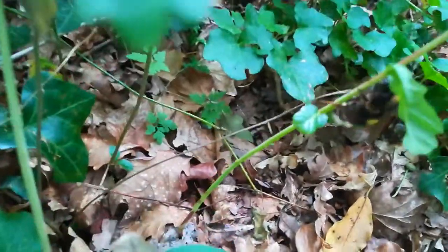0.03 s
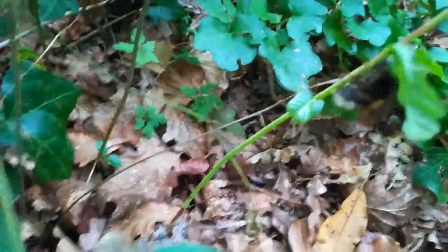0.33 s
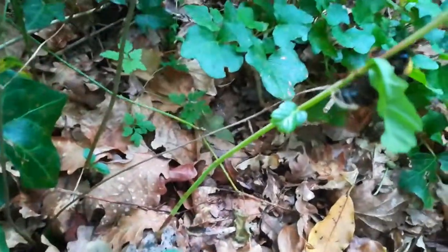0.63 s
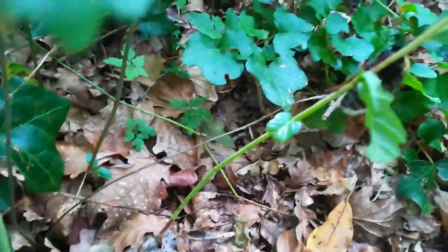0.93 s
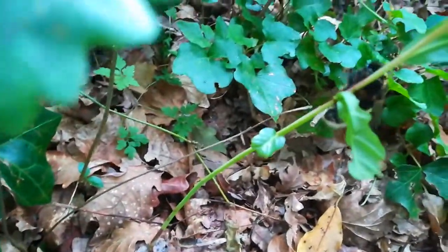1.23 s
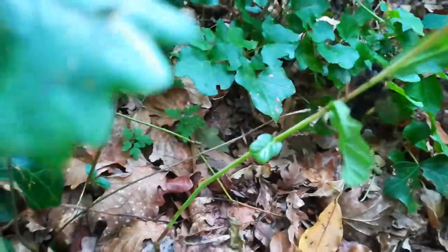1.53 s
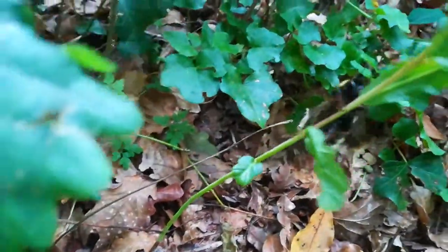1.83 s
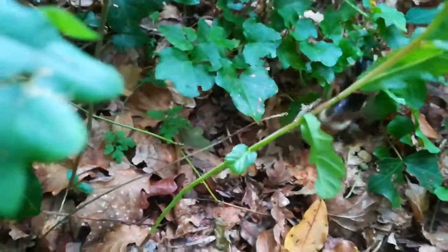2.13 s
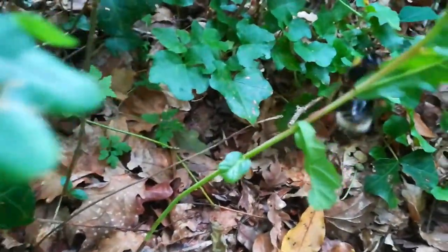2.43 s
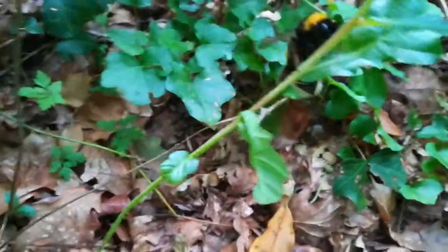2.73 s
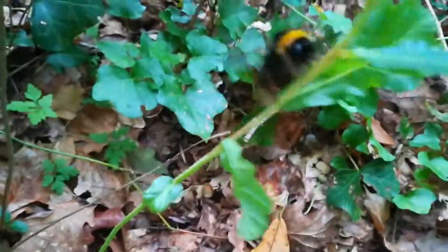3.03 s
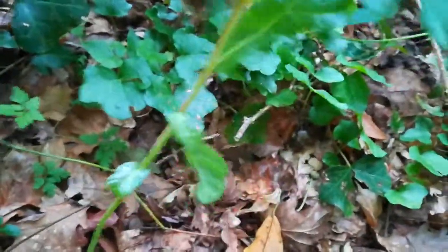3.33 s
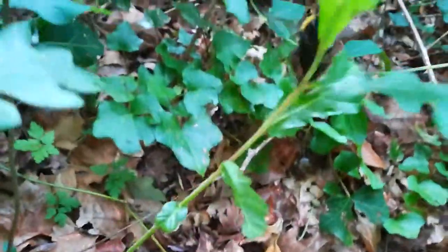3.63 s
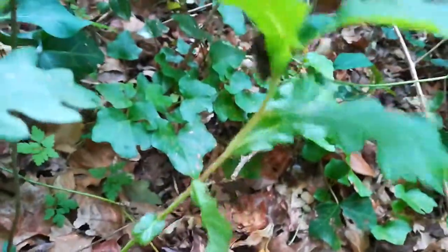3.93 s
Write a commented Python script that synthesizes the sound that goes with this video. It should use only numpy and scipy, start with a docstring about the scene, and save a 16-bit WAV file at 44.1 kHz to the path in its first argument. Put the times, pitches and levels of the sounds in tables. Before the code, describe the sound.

A bumblebee buzzes close by, but only from about 3 seconds. From the start, small birds whistle and trill faintly, echoing among trees over distant hiss and low rumble, with one soft microphone bump. Leaves tick and rustle, swelling around 1.5 seconds. At 3 seconds the bee's wings slap a leaf, then settle into a steady buzz with a papery rasp until the end at 4 seconds.

```python
"""A bumblebee climbing a stem starts its wings close by, about 3 s in. The first beats slap a leaf;
then it settles into a steady buzz, each wingbeat pushing air and brushing the leaf with a papery rasp.
From the start, small birds whistle and trill, echoed by the trees, and leaves rustle and tick
on the woodland floor. Under it all: distant hiss, low rumble and one soft bump on the microphone."""
import sys
import numpy as np
from scipy import signal
from scipy.fft import rfft, irfft
from scipy.io import wavfile
from scipy.ndimage import uniform_filter1d

SR = 44100
rng = np.random.default_rng(int(sys.argv[2]) if len(sys.argv) > 2 else 0)


def transcribe(signal):
    """Save signal, clipped to [-1, 1], as a 16-bit WAV file at the path in sys.argv[1]."""
    frames = np.atleast_2d(signal).T
    limited = np.clip(frames, -1, 1)
    pcm = np.round(limited * 32767).astype(np.int16)
    wavfile.write(sys.argv[1], SR, pcm)


N = 176400
TIME_S = np.arange(N) / SR

# Spectra. Each row: frequency in Hz, relative level in dB.
HISS_SPECTRUM = [(12, -54), (20, -8.5), (66, -5), (137, -4.5), (213, -9), (404, -14), (906, -10.5),
                 (1100, -11), (2090, -20), (3080, -21), (3350, -26.5), (5230, -12), (7730, -24),
                 (15500, -29.5)]
RUMBLE_SPECTRUM = [(15, 1), (55, 0.5), (120, -10.5), (300, -17.5), (900, -40.5)]
RUSTLE_SPECTRUM = [(150, -6), (500, -15), (900, -4), (1300, -1.5), (1900, 0.5), (3800, 3), (6000, -2),
                   (9000, -10.5), (12000, -23), (15500, -18)]
WASH_SPECTRUM = [(30, 2), (150, 2), (350, -3), (600, -12), (1200, -7), (2000, -13), (4000, -29)]
RASP_SPECTRUM = [(1120, -16), (1900, -14), (2680, -8.5), (3030, -5), (3800, -3), (4820, -0.5), (6970, -3.5),
                 (10700, -15.5), (13500, -17.5), (15500, -20)]
# Stereo balances. Each row: frequency in Hz, pan in dB (left minus right).
HISS_PAN = [(200, 1.5), (700, -2), (1300, -1.5), (3500, -1), (8000, -1), (15000, 0)]
RUSTLE_PAN = [(300, -3.5), (2400, -6), (4400, -7), (8000, 8), (15000, 2)]
RASP_PAN = [(2000, 4), (3000, 4), (4500, -7.5), (6000, 0.5), (8000, 7), (15000, 9)]
# Air noise. Each row: frequency in Hz, left-right correlation.
AIR_CORRELATION = [(60, .98), (130, .8), (290, .1), (640, -.25), (1400, .1), (3000, 0)]
# Envelopes. Each row: time in seconds, relative level in dB.
RUMBLE_LEVELS = [(0, -68), (.45, -62), (.9, -68), (1.15, -67), (1.45, -61.5), (1.75, -65), (2.0, -70.5),
                 (2.9, -65.5), (3.2, -60.5), (4, -65)]
RUSTLE_LEVELS = [(0, -67), (.75, -66.8), (.97, -67), (1.1, -62), (1.25, -58.5), (1.42, -55), (1.6, -57),
                 (1.77, -60.5), (1.87, -65), (2.1, -74), (2.9, -71.5)]
# Bird notes. Each row: start and length in seconds, first pitch, last pitch and trill depth in Hz,
# relative level in dB, pan in dB.
BIRD_NOTES = [(0.0, 0.064, 6540, 6840, 720, -50, 9), (0.176, 0.058, 6300, 6640, 370, -52.5, 6),
              (0.0, 0.11, 2600, 2350, 160, -66, -4.5), (0.18, 0.083, 2726, 3060, 130, -60.5, -8),
              (0.296, 0.035, 5570, 5280, 36, -49.5, 7), (0.334, 0.012, 5230, 5220, 73, -41, -2),
              (0.345, 0.047, 5166, 4850, 420, -48.5, -8), (0.41, 0.05, 5050, 4510, 500, -50, -10),
              (0.463, 0.15, 4530, 4324, 440, -56, -9), (0.583, 0.14, 4395, 4124, 310, -55.5, -13),
              (0.478, 0.21, 5590, 5350, 450, -66, -2), (0.709, 0.065, 7100, 8100, 200, -53.5, 11),
              (0.755, 0.064, 7880, 7520, 610, -57.5, 4), (0.866, 0.052, 5160, 5600, 490, -52.5, -4),
              (0.896, 0.056, 7600, 6840, 230, -58.5, 5), (1.019, 0.058, 5240, 5560, 550, -53, -6),
              (1.044, 0.062, 7220, 6600, 350, -56, 11), (1.171, 0.043, 5290, 5570, 560, -54, -6),
              (1.197, 0.065, 7510, 6420, 120, -55, 10), (1.338, 0.019, 4670, 4510, 53, -44.5, -3),
              (1.36, 0.0547, 4616, 4360, 123, -44, -7.5), (1.577, 0.067, 7000, 7370, 140, -54, 9),
              (1.638, 0.072, 7380, 7080, 260, -56.5, 8), (2.398, 0.04, 6394, 6520, 70, -47, 9),
              (2.467, 0.041, 5050, 4275, 110, -54.5, -5), (2.544, 0.0327, 5245, 4937, 94, -46.5, -3),
              (2.641, 0.07, 7530, 7300, 58, -53, 4.5), (2.887, 0.099, 3480, 3186, 115, -63, -9),
              (2.989, 0.11, 3105, 3063, 12, -56, -9), (3.599, 0.054, 5350, 4980, 510, -50, -12),
              (3.68, 0.09, 4570, 4180, 320, -56.5, -7), (3.795, 0.066, 3250, 3096, 150, -57, -13)]
# Dry leaf ticks. Each row: start in seconds, peak in dB, centre in Hz, decay in seconds, pan in dB.
LEAF_TICKS = [(0.411, -44, 4030, .002, -3), (1.073, -39.5, 6000, 0.0033, 1), (1.44, -45, 7500, .005, 10),
              (1.65, -47, 2110, 0.0005, -18), (2.736, -42, 2780, 0.0062, -17),
              (2.7628, -51, 2570, 0.0052, -6)]
# Wingbeat. Each row: time in seconds, rate in Hz.
WINGBEAT_RATES = [(2.96, 130), (3.0, 142), (3.02, 142), (3.06, 149), (3.115, 154), (3.15, 150.5),
                  (3.21, 154.5), (3.265, 146.5), (3.3, 148.5), (3.36, 146.5), (3.45, 150), (3.56, 148.5),
                  (3.61, 151), (3.76, 150.3), (3.81, 144.5), (3.835, 148.5), (3.885, 143), (3.92, 148),
                  (3.975, 142), (4.0, 151)]
# Buzz envelope. Each row: time in seconds, fundamental and octave in dB, relative overtone level in dB,
# overtone tilt in dB per octave.
BUZZ_LEVELS = [(2.97, -56, -54, -68, 11), (2.99, -48.5, -52.5, -61.5, 8), (3.025, -57, -52.5, -58.5, 7),
               (3.115, -48.5, -41, -49.5, 2), (3.22, -42, -43, -48.5, -2.5), (3.29, -41, -44.5, -50, -3),
               (3.48, -44, -48.5, -52, -7.5), (3.884, -45.5, -50, -53, -4),
               (3.976, -45.5, -48.5, -56.5, -3), (4.0, -48.5, -45.5, -52, 5)]
# Buzz harmonics from the third up. Each row: left and right relative level in dB.
OVERTONE_LEVELS = [(-9, -10), (-6, -14), (2.5, -11), (-5.5, -14), (.5, -7), (-6, -13), (-12.5, -9.5),
                   (-15, -16), (-13.5, -11), (-19, -14), (-19, -19)]
# Buzz stereo phase. Each row: harmonic number, lead of the left microphone in radians.
HARMONIC_LEADS = [(1, .35), (2, .9), (3, 2), (5, 2.1), (7, 1.1)]
# Wings brushing the leaf. Each row: time in seconds, relative level in dB, pan in dB.
RASP_LEVELS = [(2.97, -51, -2), (3.0, -46.5, -6), (3.04, -49.5, -3.5), (3.066, -45.5, 1), (3.142, -53, 2),
               (3.22, -49, 5.5), (3.496, -53.5, 2.0), (3.628, -53, -1.5), (3.982, -54, -1), (4.0, -47, 1)]
# Wings striking the leaf. Each row: start in seconds, peak in dB, ring in Hz, decay in seconds.
WING_SLAPS = [(2.9719, -36, 4970, 0.0014), (2.98, -37.5, 5140, .0016), (2.986, -38, 4800, 0.0017),
              (2.9927, -38, 5160, .0016), (3, -27.5, 5300, 0.00099), (3.0078, -36, 5600, .0018),
              (3.0222, -38, 5900, 0.0021), (3.0512, -30.5, 4850, .0016), (3.057, -39, 4830, .0015),
              (3.0632, -49, 5600, 0.0015), (3.069, -28.5, 4700, .0017), (3.0765, -29, 4840, .0016)]
# Struck leaf. Each row: multiple of the ring frequency, relative level in dB.
LEAF_SPECTRUM = [(.1, -14), (.5, -12), (.75, -9), (1, 13), (1.4, -5), (1.8, -15), (3, -32)]


def amp(db):
    """Decibels to gain."""
    return 10 ** (np.asarray(db) / 20)


def unit_rms(x):
    """Scales to rms 1."""
    return x / np.sqrt(np.mean(x ** 2) + 1e-20)


def curve(table, column=1):
    """One column of a time table at every sample."""
    table = np.array(table)
    return np.interp(TIME_S, table[:, 0], table[:, column])


def at_hz(table, hz):
    """Interpolates a table over log frequency."""
    table_hz, value = np.transpose(table)
    return np.interp(np.log(hz + 1), np.log(table_hz + 1), value)


def pan(db):
    """Left and right gains of constant power."""
    gains = amp(np.array([[.5], [-.5]]) * db)
    return gains / np.sqrt((gains ** 2).mean(0))


def colour(x, spectrum, pans=None):
    """Filters by a spectrum and an optional pan table; rms 1."""
    hz = np.fft.rfftfreq(x.shape[-1], 1 / SR)
    gain = amp(at_hz(spectrum, hz)) * (1 if pans is None else pan(at_hz(pans, hz)))
    return unit_rms(irfft(rfft(x) * gain, x.shape[-1]))


def drift(rate_hz):
    """Slow random wander; rms 1."""
    hz = np.fft.rfftfreq(N, 1 / SR)
    return unit_rms(irfft(rfft(rng.standard_normal(N)) * np.exp(-(hz / rate_hz) ** 2), N))


def air_noise():
    """White noise, alike at both microphones in the bass, unrelated in the treble."""
    left, other = rfft(rng.standard_normal((2, N)))
    correlation = np.clip(at_hz(AIR_CORRELATION, np.fft.rfftfreq(N, 1 / SR)), -1, 1)
    return irfft([left, correlation * left + np.sqrt(1 - correlation ** 2) * other], N)


def crackle(spread_db):
    """Stereo noise in 16-sample grains of uneven level."""
    noise = rng.standard_normal((2, N))
    grain_db = spread_db * np.clip(rng.standard_normal((2, N // 16 + 1)), -3, 3)
    return noise * amp(grain_db.repeat(16, 1)[:, :N])


def burst(decay_s, spectrum, size=4096):
    """Decaying puff of filtered noise; peak near 1."""
    puff = colour(rng.standard_normal((2, size)) * np.exp(-TIME_S[:size] / decay_s), spectrum)
    puff *= np.minimum(np.linspace(2, 0, size), 1) ** 2
    return puff / abs(puff).max(1).mean()


def add(mix, start_s, sound):
    """Mixes a sound in at start_s."""
    part = mix[:, round(start_s * SR):][:, :sound.shape[-1]]
    part += sound[..., :part.shape[1]]


def woodland(hiss_db=-67.5, rumble_trim_db=-2.5):
    """Steady distant hiss and a swelling low rumble."""
    hiss = amp(hiss_db) * colour(air_noise(), HISS_SPECTRUM, HISS_PAN)
    rumble = colour(rng.standard_normal(N), RUMBLE_SPECTRUM)
    return hiss + amp(rumble_trim_db + curve(RUMBLE_LEVELS)) * rumble


def birds(trill_hz=115.37, full_pulse_depth_hz=400, fall_s=.0063, direct_db=-8.5, echo_db=-1.5):
    """Gliding, trilled whistles among trees; deeper trills also pulse more in level."""
    out = np.zeros((2, N))
    trill = np.exp(2j * np.pi * np.cumsum(trill_hz * (1 + .25 * drift(71.05))) / SR)
    for start_s, length_s, first_hz, last_hz, depth_hz, db, pan_db in BIRD_NOTES:
        t = np.arange(0, length_s, 1 / SR)
        warble = trill[int(start_s * SR):][:len(t)]
        hz = first_hz + (last_hz - first_hz) * (t / length_s) ** .6 + depth_hz * warble.imag
        pulsing = 1 + .55 * min(depth_hz / full_pulse_depth_hz, 1) * warble.real
        envelope = np.minimum(t / (.14 * length_s), 1) * np.minimum((length_s - t) / fall_s, 1)
        note = envelope * pulsing * np.sin(2 * np.pi * np.cumsum(hz) / SR)
        gain = np.sqrt(2) * amp(db) * pan(pan_db)
        add(out, start_s, gain * amp(direct_db) * note)
        add(out, start_s, gain * amp(echo_db) * tree_echo(note))
    return out


def tree_echo(note, t60_s=.58, build_s=.00067):
    """Diffuse scatter from the trees, with the note's energy in each channel."""
    lag_s = TIME_S[:SR]
    envelope = np.exp(-np.log(1000) * lag_s / t60_s) * (1 - np.exp(-lag_s / build_s))
    echo = signal.fftconvolve(note[None], rng.standard_normal((2, SR)) * envelope, axes=1)
    return echo * np.linalg.norm(note) / np.linalg.norm(echo, axis=1, keepdims=True)


def leaf_rustle(flutter_db=2.02):
    """Dense tiny leaf clicks that swell and fade."""
    rustle = colour(crackle(spread_db=2), RUSTLE_SPECTRUM, RUSTLE_PAN)
    return rustle * amp(curve(RUSTLE_LEVELS) + flutter_db * drift(25.5))


def microphone_bump(start_s=.1362, gain_db=-41, rise_s=.0029, decay_s=.0073,
                    first_hz=231, last_hz=91, sag_s=.0059):
    """One soft knock on the microphone, sagging in pitch as it dies."""
    out, t = np.zeros((2, N)), TIME_S[:4096]
    hz = last_hz + (first_hz - last_hz) * np.exp(-t / sag_s)
    envelope = np.minimum(t / rise_s, 1) * np.exp(-t / decay_s)
    add(out, start_s, amp(gain_db) * envelope * np.sin(2 * np.pi * np.cumsum(hz) / SR))
    return out


def leaf_ticks(skirt_db_per_octave=24):
    """Dry leaves tick: short bursts of band noise."""
    out, octaves = np.zeros((2, N)), np.linspace(-4, 4, 9)
    for start_s, peak_db, centre_hz, decay_s, pan_db in LEAF_TICKS:
        band = np.column_stack([centre_hz * 2 ** octaves, -skirt_db_per_octave * abs(octaves)])
        add(out, start_s, amp(peak_db) * pan(pan_db) * burst(decay_s, band))
    return out


def bumblebee(start_s=2.961, buzz_rise_s=.006, rasp_rise_s=.028, jitter=.006):
    """One slightly unsteady wingbeat drives both buzz and rasp."""
    beats = np.cumsum(curve(WINGBEAT_RATES) * (1 + jitter * drift(41.6))) / SR
    buzz = np.clip((TIME_S - start_s) / buzz_rise_s, 0, 1) * wing_buzz(beats)
    rasp = np.clip((TIME_S - start_s) / rasp_rise_s, 0, 1) * wing_rasp(beats)
    return buzz + rasp


def per_beat(beats):
    """One random value per wingbeat, steps smoothed."""
    return uniform_filter1d(rng.standard_normal(size=1000)[beats.astype(int)], size=60)


def harmonic(order, beats, shift_rad=0):
    """One wingbeat harmonic at both microphones, left leading; rms 1."""
    lead_rad = np.array([[.5], [-.5]]) * np.interp(order, *np.transpose(HARMONIC_LEADS))
    return np.sqrt(2) * np.cos(2 * np.pi * order * beats + shift_rad + lead_rad)


def wing_buzz(beats, overtone_trim_db=-4, wash_db=-55, flutter_db=1.3, rattle_db=1.4, pivot_order=6):
    """Wings push air: a hum, a wash of noise, and overtones uneven in force and timing."""
    hum = amp(curve(BUZZ_LEVELS, 1)) * harmonic(1, beats)
    hum += amp(curve(BUZZ_LEVELS, 2)) * harmonic(2, beats)
    effort, tilt_db_per_octave = amp(curve(BUZZ_LEVELS, 3)), curve(BUZZ_LEVELS, 4)
    uneven_beats = beats + .003 * per_beat(beats)
    overtones = np.zeros((2, N))
    for order, sides_db in enumerate(OVERTONE_LEVELS, 3):
        swell_db = 1 - .16 * max(sides_db)  # weak overtones swell and fade the most
        offset_db = swell_db * drift(5) + flutter_db * drift(12)
        offset_db += tilt_db_per_octave * min(np.log2(order / pivot_order), .5)
        shift_rad = 2 * np.pi * rng.random() + .2 * drift(20)
        gain = amp(np.array(sides_db)[:, None] + offset_db)
        overtones += gain * harmonic(order, uneven_beats, shift_rad)
    overtones *= effort * amp(overtone_trim_db + rattle_db * per_beat(beats))
    wash = amp(wash_db) * effort / effort.max() * colour(air_noise(), WASH_SPECTRUM)
    return hum + overtones + wash


def wing_rasp(beats, trim_db=.5, spread_db=3, stroke_at_beat=.42, back_at_beat=.85, width_beats=.09):
    """Wings brush the leaf: a click and a rasp per stroke, a weaker rasp per backstroke."""
    force = amp(spread_db * per_beat(beats))
    stroke = np.exp(-((beats % 1 - stroke_at_beat) / width_beats) ** 2)
    backstroke = np.exp(-((beats % 1 - back_at_beat) / width_beats) ** 2)
    brushing = crackle(spread_db=1.5) * (.65 + force * (stroke + .25 * backstroke))
    clicks = 5.5 * force * np.diff(np.floor(beats - stroke_at_beat), prepend=-1)
    reflected = np.array([leaf_reflection(side) for side in brushing + clicks])
    gain = amp(trim_db + curve(RASP_LEVELS)) * pan(curve(RASP_LEVELS, 2))
    return gain * colour(reflected, RASP_SPECTRUM, RASP_PAN)


def leaf_reflection(x, delay_s=.0004, gain=.35):
    """Adds a nearby leaf's reflection; the delay wanders as the bee moves: a hollow, shifting colour."""
    delay_samples = delay_s * SR * np.exp(.2 * drift(3.13))
    return x + gain * np.interp(np.arange(N) - delay_samples, np.arange(N), x)


def wing_slaps(pan_db=1.5):
    """The first wingbeats strike the leaf hard, each at a spot with its own ring."""
    out = np.zeros((2, N))
    for start_s, peak_db, ring_hz, decay_s in WING_SLAPS:
        spectrum = np.array(LEAF_SPECTRUM) * [ring_hz, 1]
        add(out, start_s, amp(peak_db) * pan(pan_db) * burst(decay_s, spectrum))
    return out


def scene():
    """Bee in front, leaves around it, birds beyond."""
    bee = bumblebee() + wing_slaps()
    return bee + birds() + leaf_rustle() + leaf_ticks() + woodland() + microphone_bump()


def record(dry, cutoff_hz=15830):
    """Steep low-pass band limit."""
    lowpass = signal.firwin(1023, cutoff_hz, window=("kaiser", 9), fs=SR)
    return signal.oaconvolve(dry, lowpass[None], "same")


dry = scene()
out = record(dry)
transcribe(out)
```